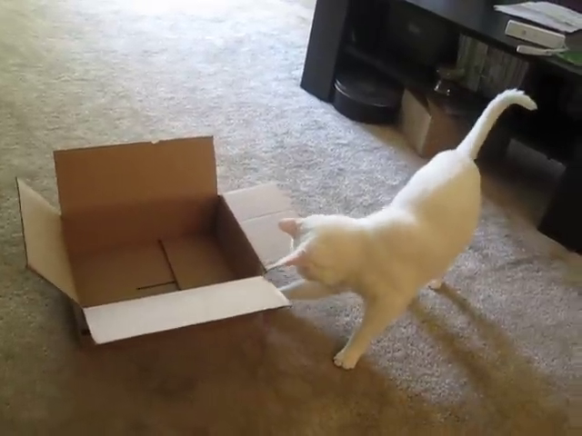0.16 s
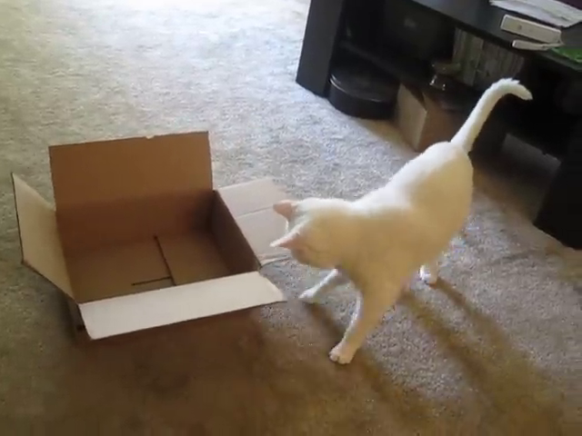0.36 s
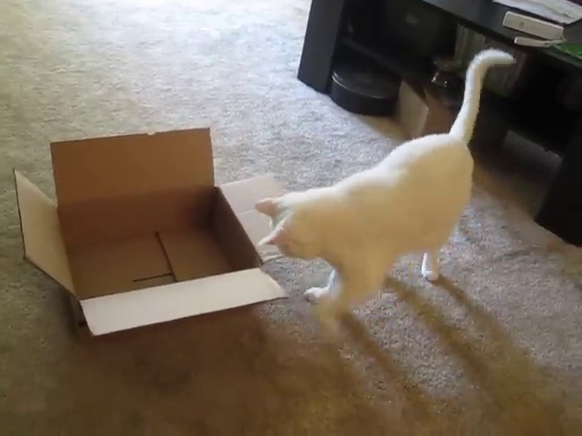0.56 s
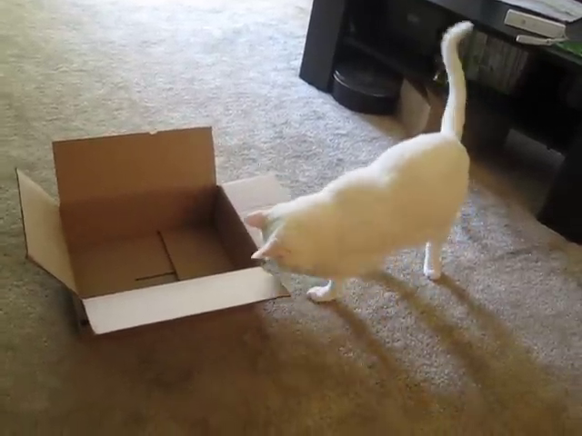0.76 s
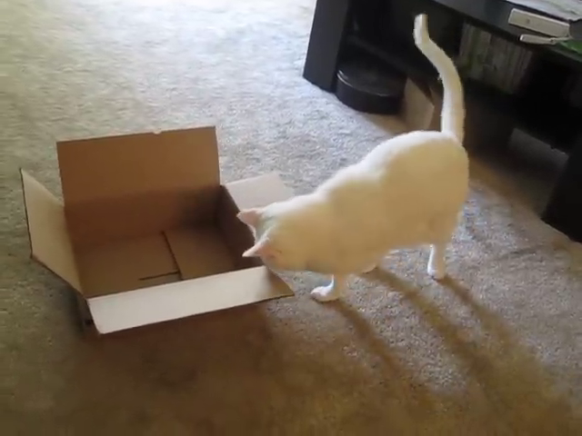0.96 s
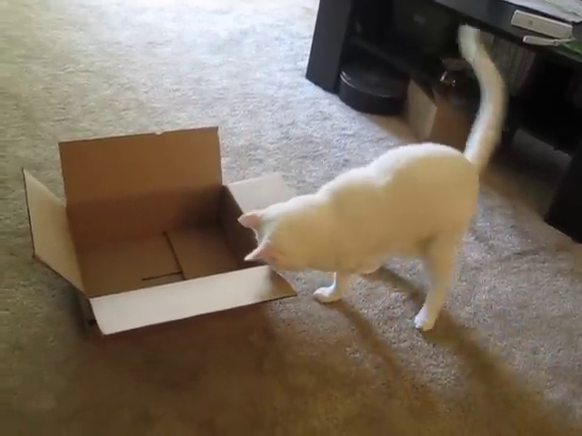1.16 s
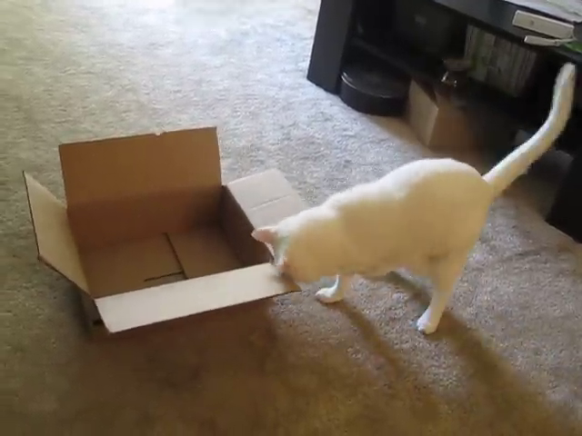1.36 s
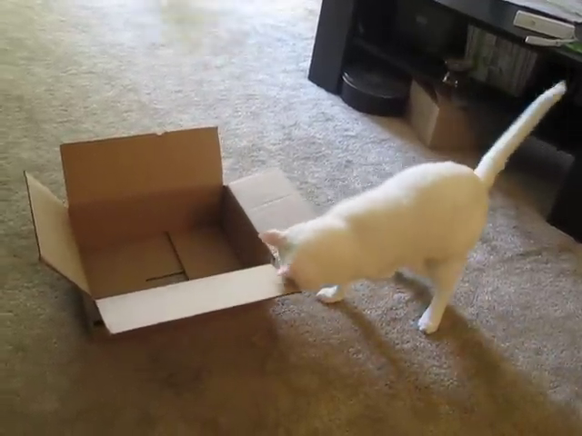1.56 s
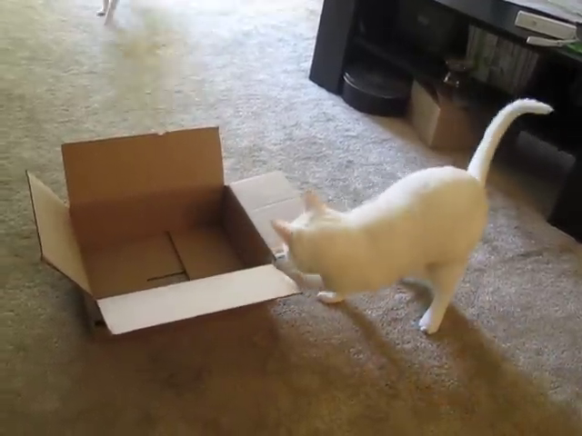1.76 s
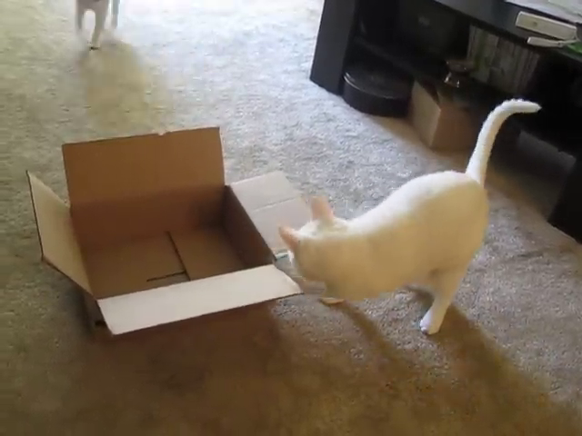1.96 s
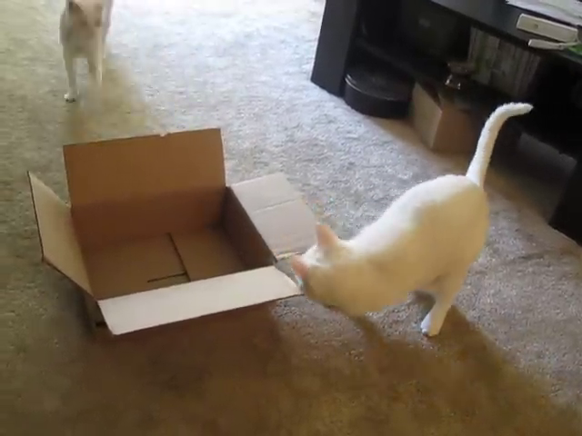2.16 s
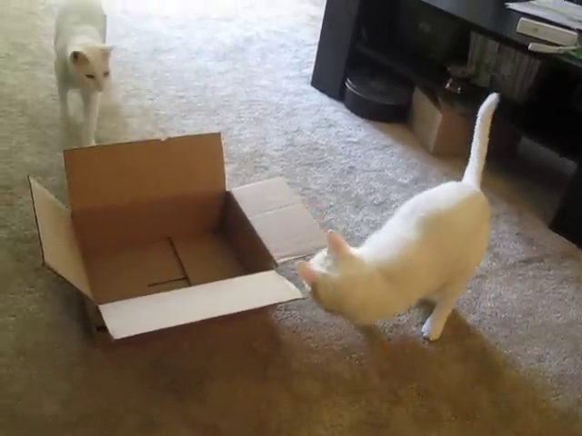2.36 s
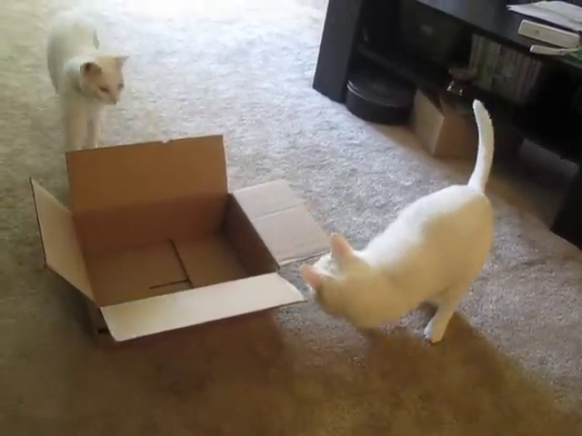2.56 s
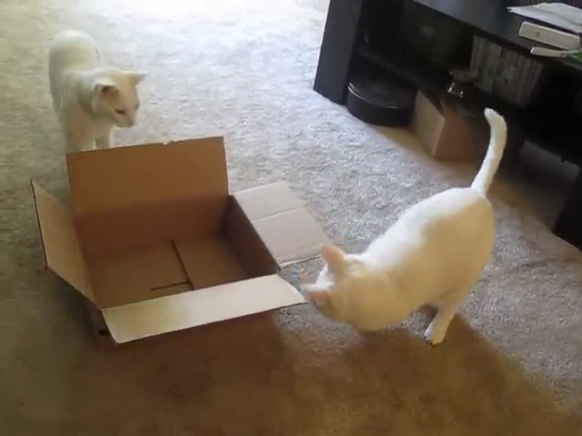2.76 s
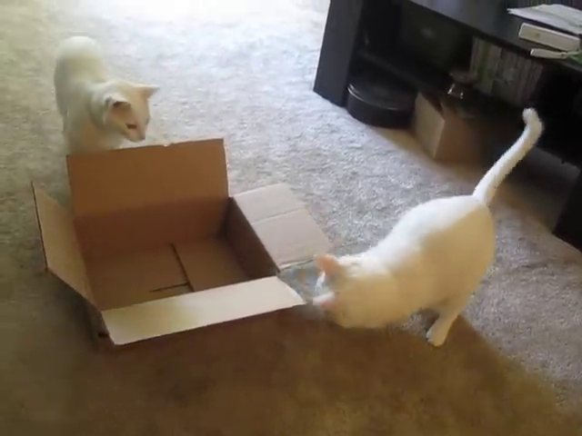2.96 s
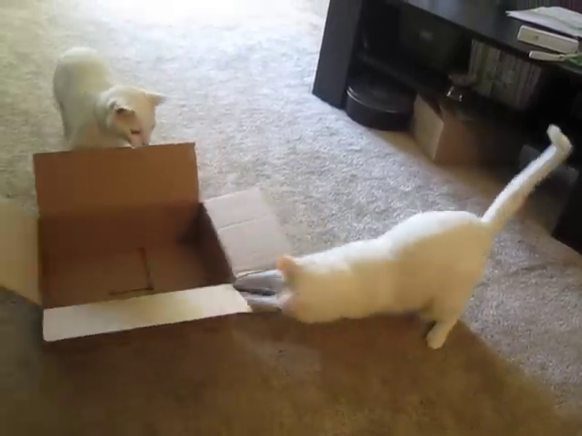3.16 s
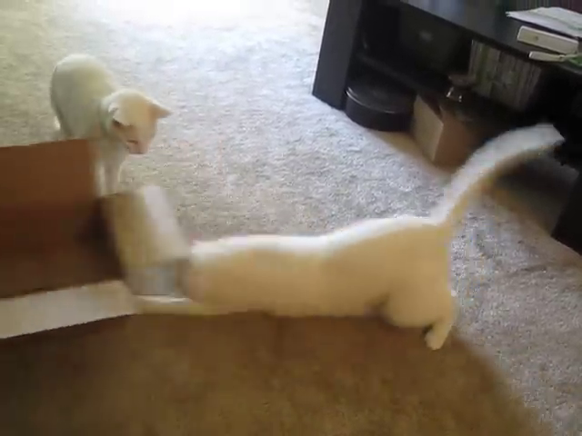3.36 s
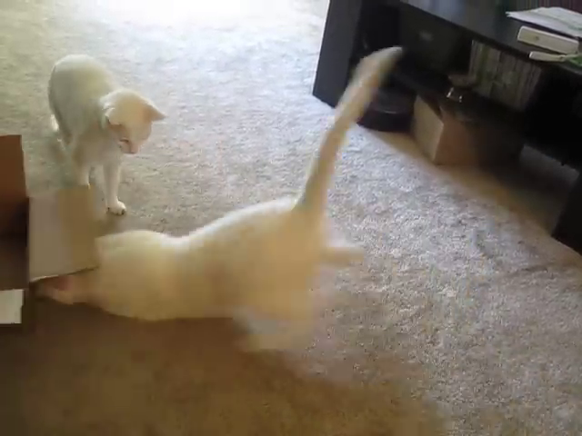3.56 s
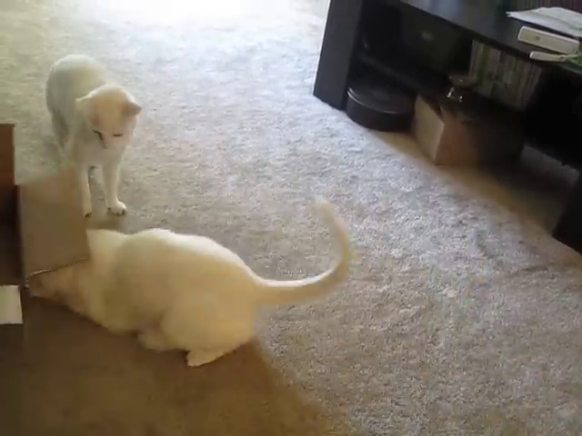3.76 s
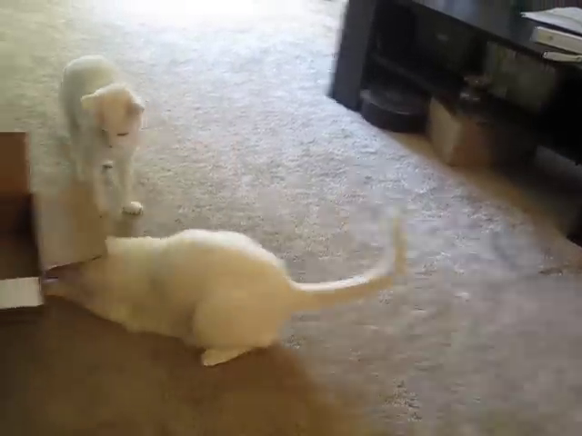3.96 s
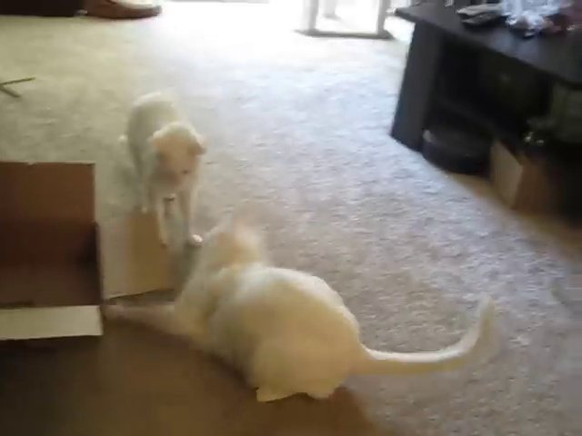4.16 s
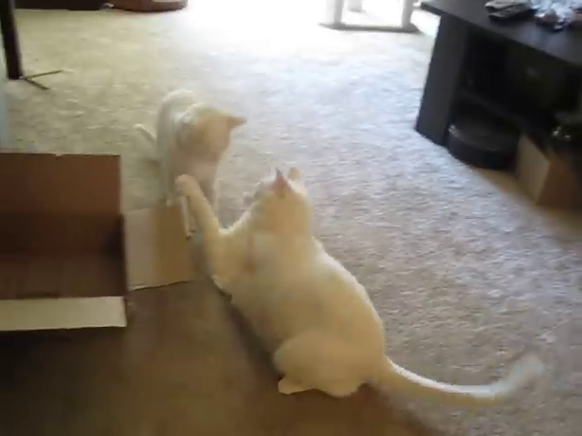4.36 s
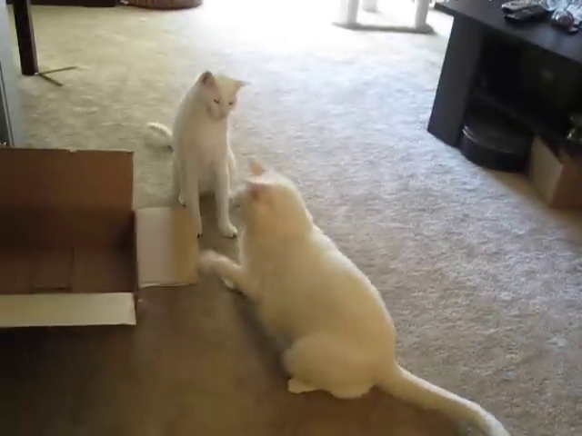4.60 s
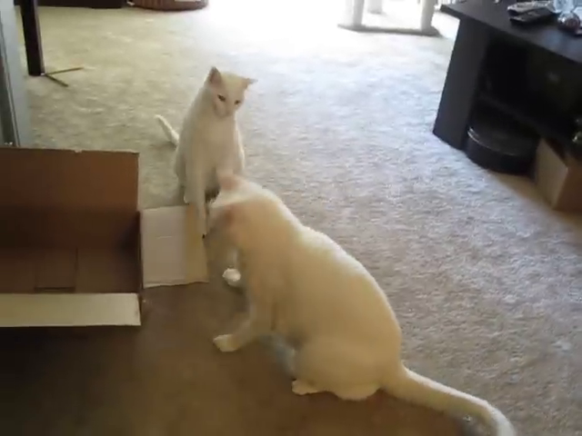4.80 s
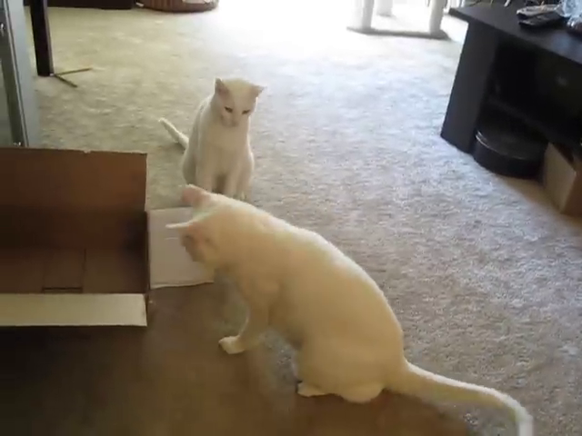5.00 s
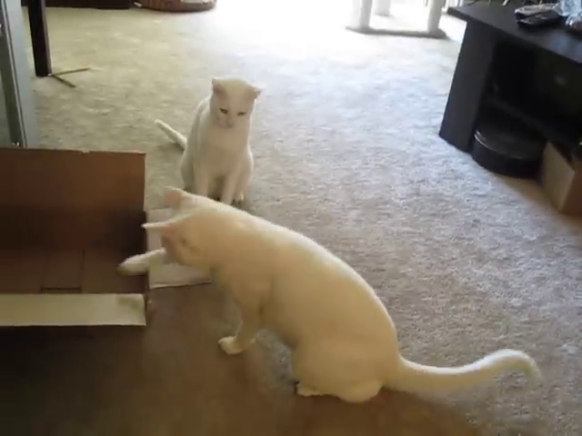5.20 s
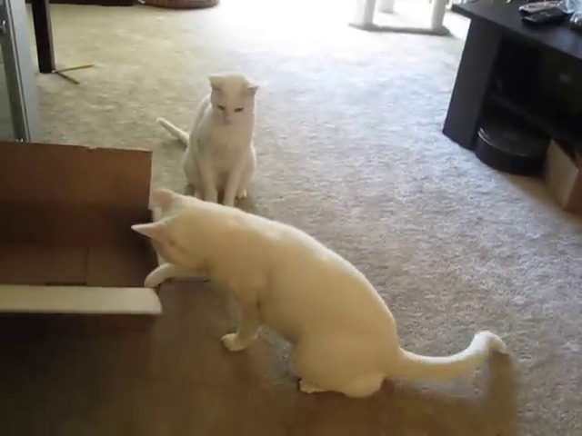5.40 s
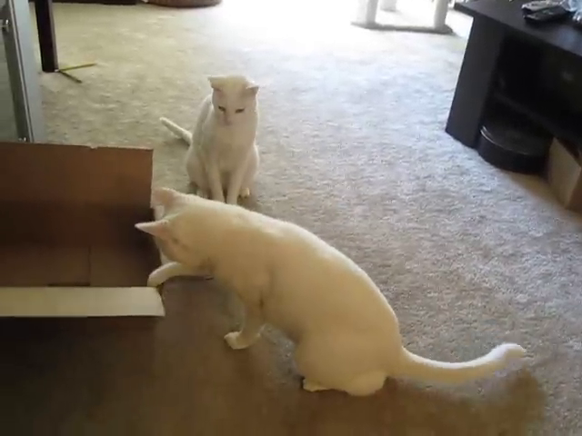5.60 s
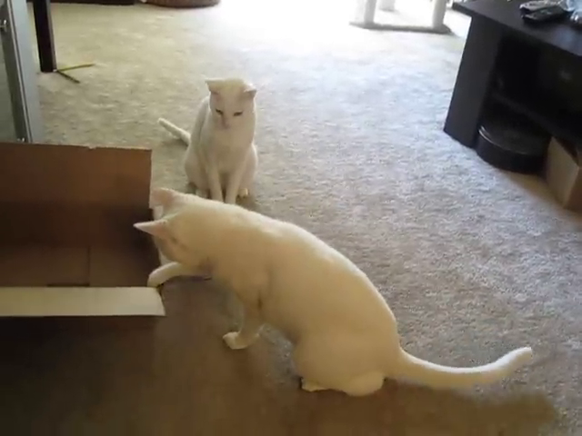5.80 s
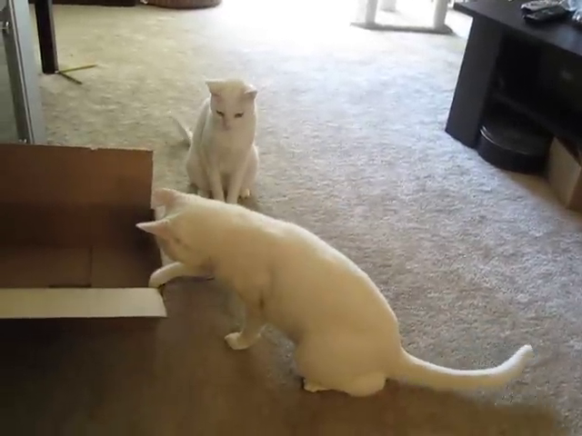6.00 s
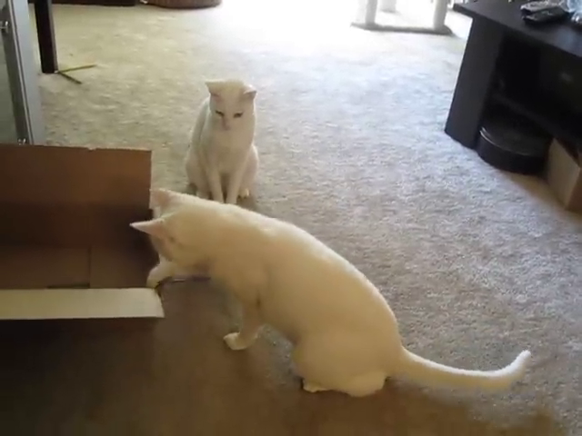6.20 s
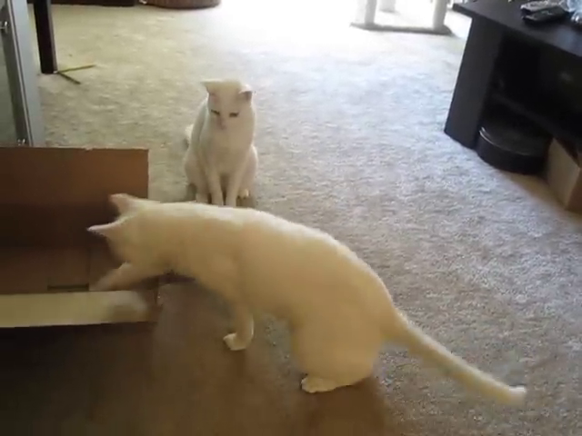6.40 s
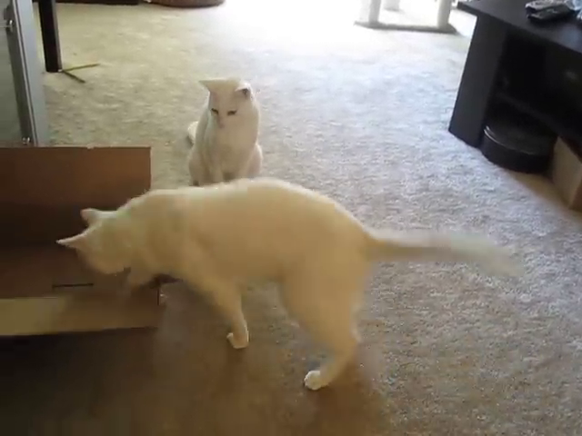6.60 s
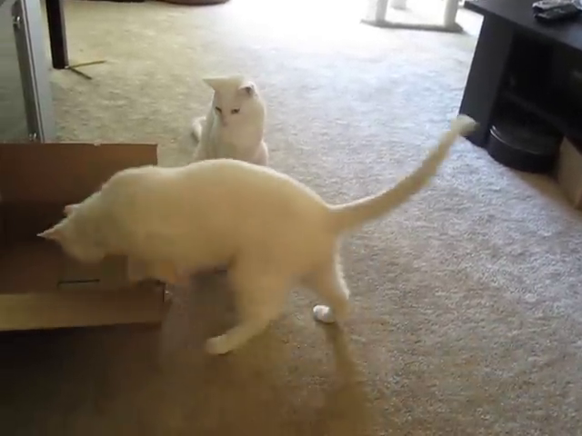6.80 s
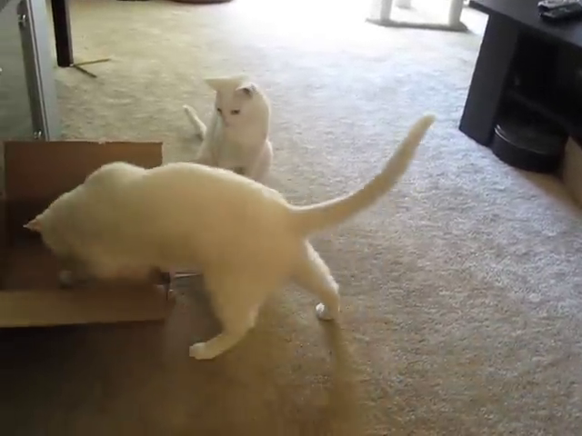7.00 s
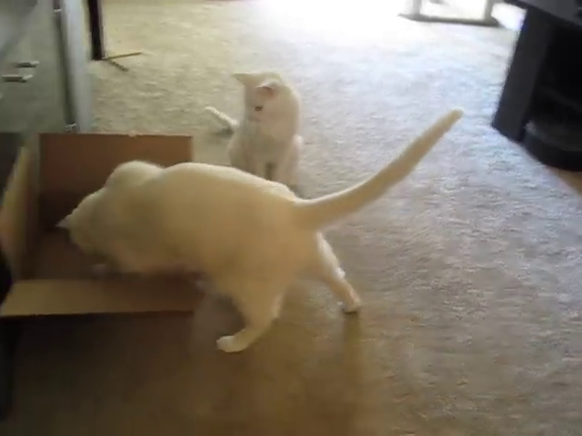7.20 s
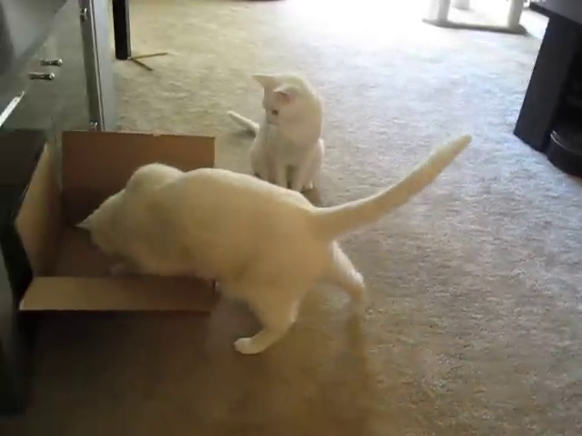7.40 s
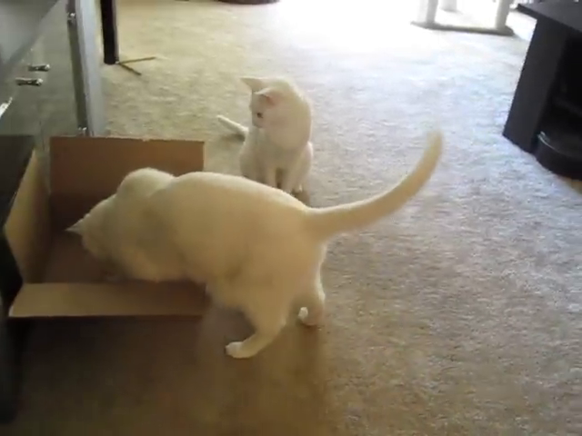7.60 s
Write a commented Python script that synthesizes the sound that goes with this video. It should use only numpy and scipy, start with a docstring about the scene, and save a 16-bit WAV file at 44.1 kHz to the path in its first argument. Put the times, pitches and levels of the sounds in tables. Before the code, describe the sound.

In a quiet carpeted living room with a low appliance hum, a cat lightly ticks and brushes a cardboard flap. After three seconds it shoves the box: hollow booming knocks, sharp cardboard cracks, a gritty slide over carpet and quick claw scrapes. Then it calms to faint paw steps, a soft tap and brush on the flap, and a few duller box bumps with rustling near the end. A small camera close by picks up slight room reflections.

```python
"""Living room: two cats play with an open cardboard box on the carpet, near a small camera.
One nuzzles a flap, paws at it, dives under it and shoves the box, claws scraping; later it taps the flap
and steps inside. Blows ring modes of air and walls with filtered noise bursts; claws, carpet, fur and paws
are filtered trains of random friction releases; short snaps are filtered bursts; thuds add a low tone to
a dull puff. An appliance hums as wavering sines under shaped air noise; noise-tap reflections form the room."""
import sys
import numpy as np
from scipy import signal
from scipy.fft import rfft, irfft
from scipy.io import wavfile
from scipy.ndimage import uniform_filter1d

SR = 44100
rng = np.random.default_rng(int(sys.argv[2]) if len(sys.argv) > 2 else 0)


def dump(signal):
    """Clip the signal to [-1, 1] and save it as 16-bit WAV at the path in sys.argv[1]."""
    limited = np.clip(np.atleast_2d(signal).T, -1, 1)
    pcm = np.round(limited * 32767).astype(np.int16)
    wavfile.write(sys.argv[1], SR, pcm)


N = 337365

# paw or head knocks the box; it drops back only if drop_delay_s > 0.005. Levels before trims:
# start_s, boom_db, air_resonance_hz, panel_clap_db, crack_db, drop_delay_s
BLOWS = [(0.957, -44, 475, -37.5, -44, 0.0013), (2.964, -27.5, 283, -31, -40, 0.002),
         (2.987, -20, 304, -32, -42, 0.024), (3.191, -19.5, 399, -28, -40, 0.021),
         (3.389, -14, 300, -21.5, -28.5, 0.03), (3.474, -15.5, 364, -29, -28.5, 0.016),
         (3.515, -13.5, 334, -21.5, -42, 0.013), (3.706, -28, 346, -46, -53, 0.00025),
         (4.585, -37, 505, -45, -64, 0.00052), (5.275, -35.5, 359, -37.5, -58, 0.00044),
         (6.45, -27.5, 348, -27.5, -41.5, 0), (6.57, -23, 336.5, -36.5, -39.5, 0.014),
         (7.011, -26, 348, -32.5, -33, 0.0011)]
# spectrum of a clapping panel: freq_hz, relative_density_db (per Hz)
CLAP_SPECTRUM = [(200, -16), (450, -1), (620, 0.5), (790, 0), (1000, 1.5), (1280, -7), (1550, -25),
                 (1950, -33), (5000, -45)]
# spectrum of the cracking contact: freq_hz, relative_density_db (per Hz)
CRACK_SPECTRUM = [(500, -42), (1200, 7), (1850, -1), (2250, 2.5), (3500, 4.5), (4800, 2), (6500, -2),
                  (9000, -6.5), (12000, -16), (16000, -37)]


def amp(db):
    """Decibels to gain."""
    return 10 ** (np.asarray(db) / 20)


def evened(x):
    """Scales to rms 1."""
    return x / np.sqrt(np.mean(x ** 2) + 1e-20)


def peaked(x, size=176):
    """Scales so that the loudest window of size samples has rms 1."""
    power = uniform_filter1d(x ** 2, size, mode="constant")
    return x / np.sqrt(power.max() + 1e-20)


def read(points, hz):
    """Interpolates a table on a log-frequency axis."""
    f, value = np.transpose(points)
    return np.interp(np.log(hz + 1), np.log(f + 1), value)


def add(mix, start_s, sound):
    """Mixes a sound in at start_s, cut at the end of the mix."""
    part = mix[max(round(start_s * SR), 0):][:len(sound)]
    part += sound[:len(part)]


def since(start_s):
    """Seconds elapsed since start_s, zero before it."""
    return np.maximum(np.arange(N) / SR - start_s, 0)


def colour(x, spectrum, tilt_db=0, size=4096):
    """Minimum-phase filter with the given spectrum, tilted by tilt_db per octave of (1 + kHz)."""
    hz = abs(np.fft.fftfreq(size, 1 / SR))
    gain_db = read(spectrum, hz) + tilt_db * np.log2(1 + hz / 1000)
    log_gain = np.log(amp(gain_db))
    taps = np.fft.ifft(np.exp(np.conj(signal.hilbert(log_gain)))).real
    return signal.fftconvolve(x, taps[:size // 2])[:len(x)]


def drift(n, hz):
    """Slow random signal of rms 1: noise under a Gaussian lowpass of width hz."""
    lowpass = np.exp(-(np.fft.rfftfreq(n, 1 / SR) / hz) ** 2)
    return evened(irfft(rfft(rng.standard_normal(n)) * lowpass, n))


def slips(n, per_s, spread_db):
    """Friction: a random train of tiny releases of uneven size, rms 1."""
    size = amp(spread_db * np.minimum(rng.exponential(1, n), 4))
    released = rng.random(n) < per_s / SR
    return evened(rng.standard_normal(n) * size * released)


def burst(t, contact_s, rattle_db, rattle_t60_s, push):
    """One sharp push, with the crush of the contact and the quickly dying rattle of the board."""
    envelope = np.exp(-t / contact_s) + amp(rattle_db - 60 * t / rattle_t60_s)
    crush = rng.standard_normal(len(t)) * envelope
    return crush / np.linalg.norm(crush) - push * (t == 0)


def knock(boom_db, air_hz, walls_db, clap_db, crack_db):
    """A knock rings the air in the box and its walls, claps a panel and cracks at the contact."""
    # bending modes of the walls: freq_hz, relative_level_db, t60_s
    wall_modes = [(126, -18.5, 0.12), (158, -14.5, 0.12), (230.4, -9.5, 0.19), (273.5, -16, 0.17),
                  (388, -10.5, 0.081), (474, -9.5, 0.033), (554, -7.5, 0.036)]
    # nearby floor and furniture throw the boom back: delay_s, gain
    echoes = [(.0062, 0.15), (0.0149, 0.16), (0.0225, .15)]
    clap_lag_s = 0.00152
    t = np.arange(SR // 3) / SR

    mode_hz, mode_db, mode_t60_s = np.transpose(wall_modes)[:, :, None]
    side = (-1) ** np.arange(len(wall_modes))[:, None]  # neighbouring modes swing in opposite directions
    # the spot struck weights and detunes the modes
    place, bend = rng.standard_normal((2, len(wall_modes), 1))
    ring = amp(mode_db + 0.85 * place - 60 * t / mode_t60_s)
    walls = side * ring * np.sin(2 * np.pi * mode_hz * (1 + 0.0036 * bend) * t)
    air = amp(-60 * t / 0.072) * (1 - np.exp(-t / 0.0033)) * np.sin(2 * np.pi * air_hz * t)
    boom = amp(boom_db - 4.5) * peaked(air + amp(walls_db) * walls.sum(0))

    clap = burst(t, contact_s=0.0058, rattle_db=-3.5, rattle_t60_s=0.13, push=0.31)
    crack = burst(t, contact_s=0.015, rattle_db=-10, rattle_t60_s=0.072, push=0.21)
    out = boom + amp(crack_db - 4.0) * peaked(colour(crack, CRACK_SPECTRUM))
    add(out, clap_lag_s, amp(clap_db - 3) * peaked(colour(clap, CLAP_SPECTRUM)))
    for delay_s, gain in echoes:
        add(out, delay_s, gain * boom)
    return out


def blows():
    """Each blow knocks the box; if it lifts, it drops back softly and its flaps flop down after it."""
    # walls ring a little below the air; blows above buckle_db bring them out
    walls_base_db, buckle_db, buckle_db_per_db = -3, -18.5, 3.2
    # drop and flop levels re the blow's boom, claps and cracks re their own boom
    drop_db, rest_hz, drop_clap_db, drop_crack_db = -1.5, 336.3, -18, -29
    flop_delay_s, flop_db, flop_hz = 0.053, -15, 331
    flap_detune = 0.045  # rms share; the flaps never lie the same way twice
    out = np.zeros(N)
    for start_s, boom_db, air_hz, clap_db, crack_db, drop_delay_s in BLOWS:
        walls_db = walls_base_db + buckle_db_per_db * max(boom_db - buckle_db, 0)
        add(out, start_s, knock(boom_db, air_hz, walls_db, clap_db, crack_db))
        if drop_delay_s > 0.005:
            drop = (drop_delay_s, boom_db + drop_db, rest_hz)
            flop = (drop_delay_s + flop_delay_s, boom_db + flop_db, flop_hz)
            for delay_s, db, hz in (drop, flop):
                hz = hz * (1 + flap_detune * rng.standard_normal())
                fall = knock(db, hz, walls_base_db, db + drop_clap_db, db + drop_crack_db)
                add(out, start_s + delay_s, fall)
    return out


def thuds():
    """Soft weight on a carpeted floor, from landings and under each blow: boards give under a dull puff."""
    # paws and bodies land on the floor or the bottom of the box: start_s, level_db (before trims)
    landings = [(3.578, -32), (3.7, -36), (3.806, -34), (3.88, -35), (5.276, -38.5)]
    # spectrum of the puff: freq_hz, relative_density_db (per Hz)
    puff_spectrum = [(25, -44), (55, -32), (85, 7.5), (120, -2), (220, 1.5), (400, 0), (800, -33),
                     (2000, -76)]
    floor_db = -21.5  # re the boom of each blow
    under_blows = [(start_s, boom_db + floor_db) for start_s, boom_db, *_ in BLOWS]
    out, t = np.zeros(N), np.arange(SR // 3) / SR
    press = (1 - np.exp(-t / 0.0029)) * amp(-60 * t / 0.22)
    for start_s, db in landings + under_blows:
        board_hz = 88 * (1 + 0.06 * rng.standard_normal())
        boards = np.sin(2 * np.pi * board_hz * t) * press
        puff = colour(rng.standard_normal(len(t)) * press, puff_spectrum)
        thud = amp(-4) * peaked(boards, size=600) + amp(-3.5) * peaked(puff, size=600)
        add(out, start_s, amp(db) * thud)
    return out


def sliding():
    """Carpet fibres flick along the bottom of the box, a few catch on its edge; shoves start fast and stop."""
    # a shove slides the box over the carpet: start_s, length_s, level_db (before trims), slowing_db_per_s
    shoves = [(2.964, 0.18, -38.5, 50), (3.184, 0.13, -35.5, 76), (3.316, 0.3, -41, 8.5),
              (3.636, 0.095, -37.5, 150), (3.76, 0.11, -49, 0)]
    # spectrum of the fibres: freq_hz, relative_density_db (per Hz)
    carpet_spectrum = [(60, 3), (300, 4), (700, -3.5), (1100, 1.5), (1800, -3.5), (2700, 0.5), (4800, 1.5),
                       (6500, 0), (9000, -1), (11000, -7.5), (13000, -15), (16000, -23)]
    attack_s, stop_s = 0.017, 0.028  # linear rise, decay time constant
    speed = np.zeros(N)
    for start_s, length_s, db, slowing_db_per_s in shoves:
        slowing_db = slowing_db_per_s * np.minimum(since(start_s), length_s)
        push = np.minimum(since(start_s) / attack_s, 1) * amp(db - slowing_db)
        speed += push * np.exp(-since(start_s + length_s) / stop_s)
    flicks = slips(N, per_s=18000, spread_db=0.8)
    catches = slips(N, per_s=460, spread_db=0.5)
    fibres = evened(colour(flicks + amp(-10) * catches, carpet_spectrum))
    return amp(-0.5) * speed * amp(0.85 * drift(N, hz=60)) * fibres


def ticks():
    """Short snaps of claws, creases and blows: bright ones mostly crack, dull ones mostly panel clap."""
    # start_s, snap_db (before trim), brightness_db_per_octave
    snaps = [(0.077, -32, 6), (0.241, -40.5, 0), (3.2, -28, 4.5), (3.391, -22.5, 4), (3.474, -23.5, -5),
             (3.5135, -20.5, -9), (3.578, -29, -1.5), (3.794, -39, 0), (3.814, -30.5, -5.5),
             (4.506, -49, -9), (4.785, -34, -2), (6.61, -41.5, -1), (6.66, -37, 0.5), (7.017, -29.5, 5.5),
             (7.069, -34.5, 0), (7.091, -34.5, 2), (7.247, -39, -9), (7.291, -40.5, 1)]
    # panel clap: dB re snap at even brightness, dB lost per dB/octave of brightness
    panel_db, panel_slope = -7, 1.75
    out, t = np.zeros(N), np.arange(SR // 8) / SR
    for start_s, snap_db, bright_db in snaps:
        clap_db = snap_db + panel_db - panel_slope * bright_db
        snap = burst(t, contact_s=0.0021, rattle_db=-35, rattle_t60_s=0.064, push=0.67)
        snap = colour(snap, CRACK_SPECTRUM, bright_db)
        clap = burst(t, contact_s=0.0049, rattle_db=-23, rattle_t60_s=0.035, push=3.1)
        clap = colour(clap, CLAP_SPECTRUM)
        add(out, start_s, amp(snap_db - 4.5) * peaked(snap) + amp(clap_db - 4.0) * peaked(clap))
    return out


def rakes():
    """Claws stick and slip over the ribbed board."""
    # start_s, level_db, length_s
    scrapes = [(0.072, -44.5, 0.028), (0.241, -47, 0.017), (3.556, -32, 0.0049), (3.637, -30.5, 0.039),
               (3.691, -34, 0.035), (3.774, -35, 0.029), (3.827, -41, 0.023), (3.85, -31, 0.011),
               (7.005, -43, 0.019)]
    # spectrum of a scrape: freq_hz, relative_density_db (per Hz)
    rake_spectrum = [(150, -31), (450, -1), (850, -8.5), (1100, 1), (1350, 1.5), (1650, -11.5),
                     (1950, -11.5), (2300, -7.5), (3700, -14.5), (7000, -23), (16000, -35)]
    out, t = np.zeros(N), np.arange(SR // 4) / SR
    for start_s, db, length_s in scrapes:
        u = t / length_s
        grip = (1 - np.exp(-u / 0.038)) * np.exp(-u ** 4)
        scrape = grip * slips(len(t), per_s=5200, spread_db=-0.2)
        add(out, start_s, amp(db) * peaked(colour(scrape, rake_spectrum)))
    return out


def brushing():
    """Fur and paw pads hiss on the board in swelling strokes; with pressure the flap sounds, chattering."""
    # start_s, rise_s, t60_s, level_db, pressure_db (flap re hiss)
    strokes = [(1.13, 0.084, 1.7, -53.5, 3), (1.3, 0.077, 0.5, -54, 7), (1.52, 0.13, 0.28, -60, 5),
               (4.578, 0.0093, 0.37, -52.5, -6), (5.273, 0.006, 0.42, -43.5, -9),
               (6.17, 0.042, 0.43, -55, -24), (6.53, 0.024, 0.7, -54.5, -17), (7.12, 0.12, 0.4, -49.5, 4),
               (7.385, 0.014, 0.18, -56.5, 2), (7.505, 0.049, 0.37, -49.5, -2)]
    # spectra of the hiss and of the flap: freq_hz, relative_density_db (per Hz)
    fur_spectrum = [(400, 5), (1500, -3.5), (3500, -4), (5000, -6.5), (7000, -7.5), (9500, -10),
                    (12000, -15.5), (16000, -39.5)]
    flap_spectrum = [(80, -12), (250, -6.5), (400, -1), (500, 5.5), (620, -0.5), (760, -2.5), (900, 1),
                     (1100, -4), (1700, -10.5), (3000, -26)]
    out = np.zeros(N)
    drag = slips(N, per_s=4000, spread_db=-0.1) * amp(1.95 * drift(N, hz=30))
    hiss = evened(colour(drag, fur_spectrum))
    chatter = drag * amp(2.5 * drift(N, hz=45))
    flap = evened(colour(chatter, flap_spectrum))
    for start_s, rise_s, t60_s, db, pressure_db in strokes:
        rise = np.minimum(since(start_s) / rise_s, 1) ** 0.41
        stroke = rise * amp(db - 60 * since(start_s + rise_s) / t60_s)
        out += stroke * (hiss + amp(pressure_db) * flap)
    return out


def steps():
    """A paw plucks at the carpet and lifts from the pile with a short, dry crackle."""
    # start_s
    step_starts = [1.81, 2.274, 2.823, 4.081, 4.665, 4.852, 5.056, 6.301, 6.868]
    # spectrum of the crackle: freq_hz, relative_density_db (per Hz)
    step_spectrum = [(500, 3), (1800, 0.5), (2600, -5), (3400, 3), (4600, -11), (7000, -20), (15000, -33)]
    step_db = -50.5
    out, t = np.zeros(N), np.arange(SR // 6) / SR
    peel = (1 - np.exp(-t / 0.0007)) * amp(-60 * t / 0.077)
    for start_s in step_starts:
        crackle = peel * slips(len(t), per_s=1500, spread_db=3.5)
        add(out, start_s, amp(step_db) * peaked(colour(crackle, step_spectrum)))
    return out


def background():
    """Air noise, wavering slightly, and appliance tones that waver in level and phase."""
    # spectrum of the air noise: freq_hz, relative_density_db (per Hz)
    air_spectrum = [(20, -1.5), (55, 2.5), (130, -1.5), (210, 1.5), (290, -1.5), (460, -1), (700, -7),
                    (1170, -5), (1550, -11.5), (2800, -17.5), (4100, -16), (4800, -20.5), (9000, -25),
                    (16000, -35)]
    # tones of the appliance: freq_hz, level_db (before trim and wavering)
    hum_tones = [(118.4, -61.5), (193.8, -61), (457.6, -60.5), (570.6, -74), (1152, -70.5), (2105, -76.5),
                 (4097, -77)]
    t = np.arange(N) / SR
    air = evened(colour(rng.standard_normal(N), air_spectrum)) * amp(0.31 * drift(N, hz=2.6))
    hum = np.zeros(N)
    for hz, db in hum_tones:
        level = amp(db + 4.6 * drift(N, hz=1.6))
        hum += level * np.sin(2 * np.pi * hz * t + 0.89 * drift(N, hz=21))
    return amp(-50.46) * air + amp(1.5) * hum


def room(x, wet_db, first_s):
    """Adds sparse reflections, each band dying at its own speed, cycling among three random patterns."""
    # decay of the room: freq_hz, t60_s
    room_decay = [(100, 0.42), (400, 0.35), (1000, 0.31), (3000, 0.35), (8000, 0.2), (15000, 0.29)]
    cycle_hz = 3.5
    count, out = SR // 2, x
    for k in range(3):
        sparse = (rng.random(count) < 3000 / SR) * (np.arange(count) > first_s * SR)
        taps = rng.choice([-1., 1.], count) * sparse
        hz, t, z = signal.stft(taps, SR, nperseg=256)
        decay = amp(-60 * t / read(room_decay, hz)[:, None])
        tail = signal.istft(z * decay, SR, nperseg=256)[1]
        # three phases: the squared shares always sum to 1
        share = np.sqrt(2 / 3) * np.sin(2 * np.pi * (cycle_hz * np.arange(N) / SR + k / 3))
        out = out + amp(wet_db) * signal.oaconvolve(x * share, tail / np.linalg.norm(tail))[:N]
    return out


def scene():
    """Everything the cats do, heard in the room; snaps and scrapes get more reflections than the rest."""
    box = blows() + thuds() + sliding() + brushing() + steps()
    snaps_and_scrapes = ticks() + rakes()
    wet_box = room(box, wet_db=-9.5, first_s=0.008)
    wet_snaps = room(snaps_and_scrapes, wet_db=-6.5, first_s=0.004)
    return (wet_box + wet_snaps + background())[None]


def record(dry):
    """The camera's band limit: a linear-phase lowpass."""
    edge_hz = 15900
    taps = signal.firwin(511, edge_hz, window=("kaiser", 9), fs=SR)
    return signal.oaconvolve(dry, taps[None], "same")


dry = scene()
out = record(dry)
dump(out)
```